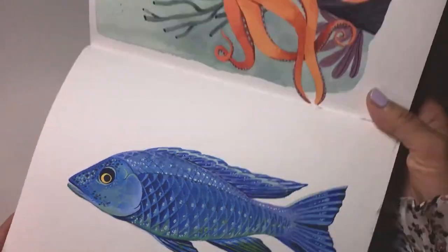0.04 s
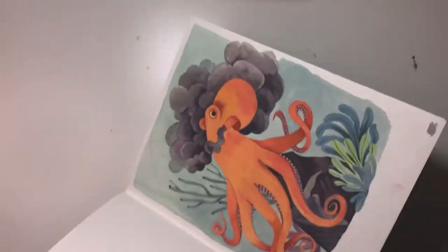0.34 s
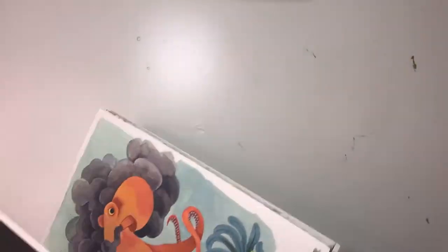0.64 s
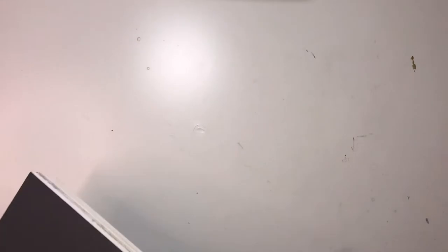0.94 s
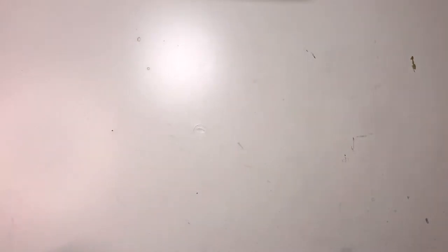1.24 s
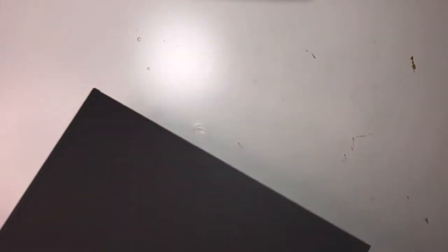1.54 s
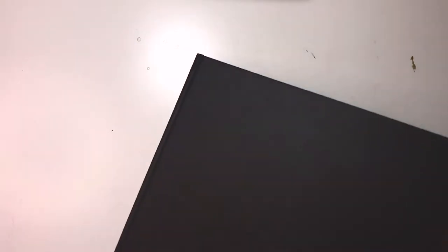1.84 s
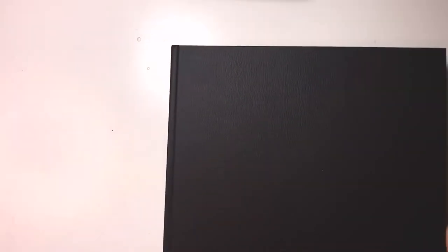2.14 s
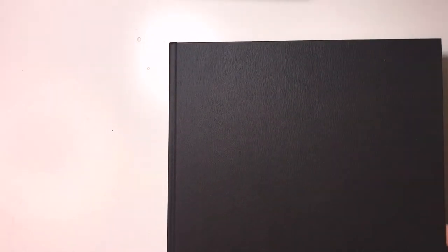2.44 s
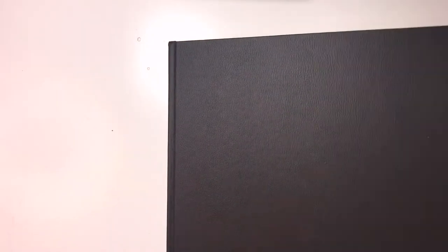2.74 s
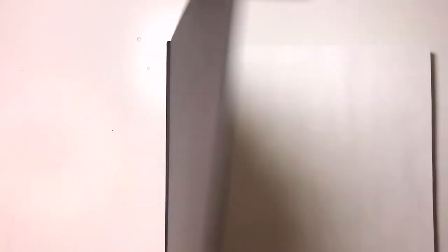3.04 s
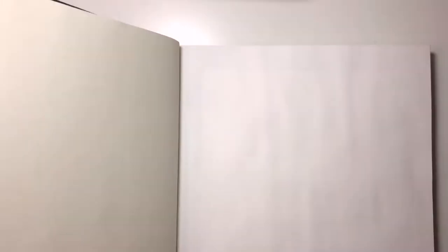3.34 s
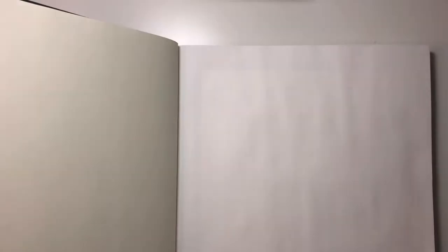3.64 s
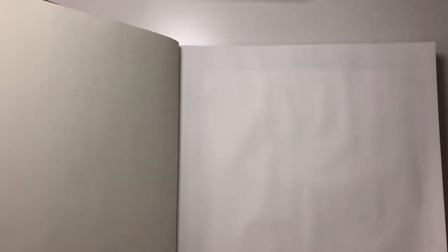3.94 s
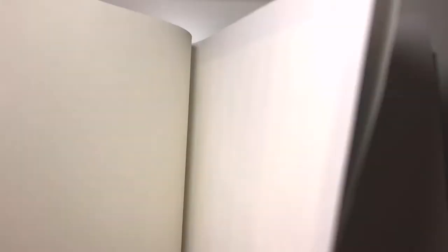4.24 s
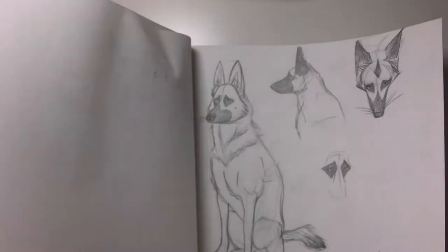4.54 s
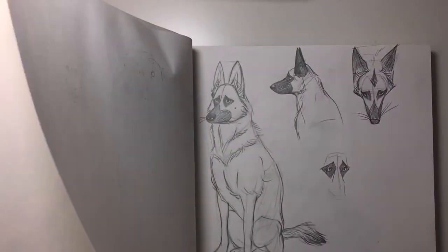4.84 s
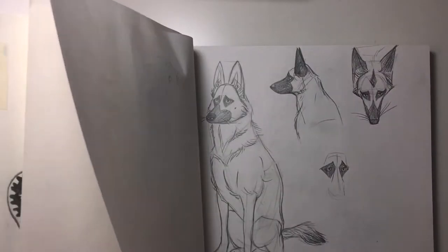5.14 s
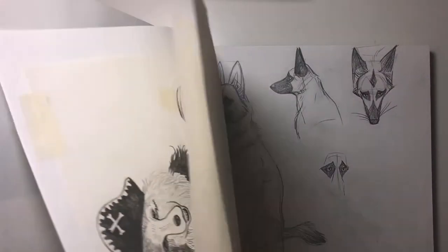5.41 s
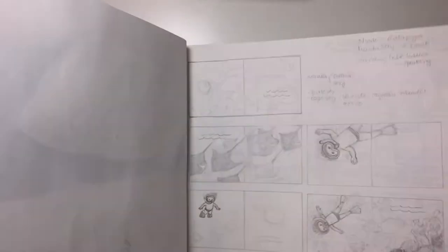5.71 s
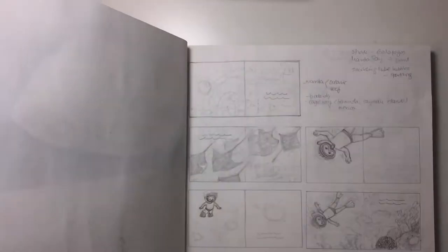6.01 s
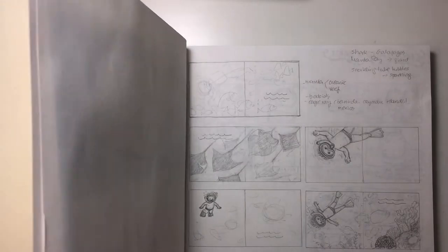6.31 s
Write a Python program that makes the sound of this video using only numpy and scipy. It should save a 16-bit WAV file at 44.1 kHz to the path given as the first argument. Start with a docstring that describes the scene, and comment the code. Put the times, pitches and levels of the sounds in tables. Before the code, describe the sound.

A hardback book is handled and thumps onto a desk, then its paper pages rustle and flick as they turn.

```python
"""Leafing through a sketchbook

A hardback sketchbook is closed, laid on a desk in a small room, opened again and leafed through.
Sheets slide over each other and under the fingers in stick-slip friction, snap as they buckle and
flick as their edges slip free. Cover and spine strike the desk top and excite its modes as thumps;
handling adds a low rumble, and the room a short reverberation and faint steady noise."""
import sys
import numpy as np
from scipy import signal
from scipy.fft import rfft, irfft
from scipy.io import wavfile

SR = 44100
rng = np.random.default_rng(int(sys.argv[2]) if len(sys.argv) > 2 else 0)


def store_pcm(level_fs):
    """Save levels as 16-bit WAV."""
    pcm = np.round(np.clip(level_fs, -1, 1) * 32767).astype(np.int16)
    wavfile.write(sys.argv[1], SR, np.atleast_2d(pcm).T)


N = 289808
TIME = np.arange(N) / SR

# modes of the damped desk top and standing waves of the room: (frequency [Hz], level [dB], T60 [s])
DESK_MODES = [(57.7, -13.5, 0.37), (107.8, -8, 0.34), (150.3, -2, 0.17), (195.7, -15, 0.3),
              (239.5, 9, 0.03), (250.8, -12.5, 0.086), (283.6, -5, 0.15), (339.4, -7, 0.31),
              (424, -13, 0.19), (497, -13.5, 0.17), (570, -20, 0.2), (591, -7.5, 0.15), (676, -20, .07),
              (910, -32, .1), (1280, -31, .08), (1400, -28, 0.12)]


def paper():
    """Source and filter: friction noise in three bands (flexing, rubbing, hiss) drives the sheet."""
    # Butterworth stages of each band: (cutoff [Hz], kind, order)
    flexing = [(1517, "low", 4), (640, "high", 1), (163, "high", 2)]
    rubbing = [(1540, "high", 3), (6680, "low", 4)]
    hiss = [(5540, "high", 3), (12100, "low", 1)]
    friction = np.zeros(N)
    for envelope, band in zip(paper_envelopes(), [flexing, rubbing, hiss]):
        slips = fibre_slips(per_s=3000, spread_db=3.5)
        steady_rms = np.std(sheet(cascade(slips, band)))
        friction += cascade(slips * envelope, band) / steady_rms
    return early_reflections(sheet(friction) + brief_rings(), sway=0.0843, sway_hz=2.0)


def paper_envelopes():
    """Incoherent sources add in power: strokes, buckles and flicks give each band its amplitude."""
    # a hand slides paper or board along:
    # (start [s], duration [s], rubbing [dB], flexing [dB re rubbing], hiss [dB re rubbing])
    strokes = [(-.03, .12, -46.5, -2.5, -1.5), (0.205, 0.075, -52.5, 2, 0), (0.302, 0.17, -43, -11, -0.5),
               (0.587, 0.057, -39.5, -7.5, -1.5), (0.661, 0.078, -46.5, 0, 3.5), (0.76, 0.1, -46, 1.5, 1),
               (0.926, 0.23, -51, -8.5, 6.5), (1.345, 0.047, -56.5, 7, 4), (1.48, 0.077, -56.5, -4, 1),
               (1.659, 0.019, -41.5, 6.5, 6.5), (1.758, 0.089, -53.5, 2.5, 8), (1.843, 0.053, -40, 7.5, -1),
               (1.92, 0.32, -46.5, 1.5, -1), (2.325, 0.039, -50.5, 6, 2), (2.4, 0.17, -72, 13.5, -20),
               (2.57, 0.066, -41, 5, 2), (2.745, 0.12, -47.5, 10, 0), (2.936, 0.1, -46.5, -1.5, -3.5),
               (3.057, 0.089, -42, -2.5, 0.5), (3.218, .035, -41.5, 0, -1.5), (3.336, 0.14, -56, 3, -7),
               (3.6, 0.21, -57, -4, 4.5), (3.764, 0.029, -36.5, -4, 3), (3.817, 0.31, -42, -3.5, -1),
               (3.96, 0.23, -38.5, 2, -6), (4.097, 0.29, -29.5, -3, -3.5), (4.356, 0.18, -30, -5.5, -7),
               (4.578, .14, -40.5, -4.5, -6), (4.787, 0.099, -38.5, -5.5, -4), (4.939, 0.23, -48, -3, -8),
               (5.047, 0.14, -42.5, -5, -5), (5.22, 0.087, -38.5, -18.5, -2),
               (5.28, 0.061, -33.5, -5, -4.5), (5.383, 0.094, -33, -2.5, -3.5),
               (5.544, 0.095, -32.5, -3, -5), (5.679, 0.073, -39, -0.5, -7.5),
               (5.801, 0.023, -32.5, -2, -8), (5.892, 0.12, -35, -6, -6), (5.995, 0.032, -26, -12, 0),
               (6.064, 0.054, -39, -4.5, -1.5), (6.166, 0.098, -53, -3, -3.5),
               (6.273, 0.021, -28, -6, -1.5), (6.375, 0.052, -33, -7, -2.5),
               (6.454, 0.073, -30.5, -9.5, -1.5)]
    # sharp snaps and taps of paper and board:
    # (time [s], rubbing [dB], flexing [dB re rubbing], hiss [dB re rubbing])
    snaps = [(0.222, -39.5, 3, -3.5), (.428, -46, -9, 6), (0.464, -45, -2, -12), (0.552, -46, -16, 4),
             (.603, -30.5, -0.5, -12), (.61, -48, -4, 8), (0.801, -36.5, 17, -7), (.865, -47, 5, 5),
             (1.176, -42.5, -2, 3), (1.265, -59.5, 1, -1), (1.355, -52, -2, 2.5), (1.376, -48.5, 12.5, -4),
             (1.664, -39, 12.5, 5.5), (1.772, -47, 6.5, 12), (1.853, -22, 8, -2.5), (1.882, -35, -1, 3.5),
             (2.128, -53, -3, 10), (2.325, -38.5, 6, -2), (2.368, -52, 1, 7), (2.613, -35.5, -8, 5.5),
             (2.631, -27, -13, 5.5), (2.747, -41.5, 3.5, 4.5), (3.237, -39, -0.5, 1), (3.603, -44, 1, 9),
             (3.711, -45, -0.5, 2), (3.783, -44, -6, 11), (3.813, -35.5, 2, 2), (4.094, -21.5, 1, -1),
             (4.202, -25.5, 0, 0), (4.221, -20.5, -3.5, 2), (4.273, -24, -6, -18), (4.304, -21, -12, -4),
             (4.337, -21.5, -6.5, -5.5), (4.517, -20.5, -4, -7), (4.645, -39.5, 10, -1),
             (5.545, -32, 2.5, -4), (6.005, -33, -10, 2), (6.28, -32.5, -21, 0), (6.526, -22, -9.5, -4)]
    # an edge slips free in a short Gaussian swell:
    # (time [s], rubbing [dB], flexing [dB re rubbing], hiss [dB re rubbing], half length [s])
    flicks = [(0.36, -32.5, -5, -6.5, 0.0053), (4.017, -35.5, 9.5, -1, .003), (4.489, -32, 9, 3.5, 0.008),
              (4.534, -21, -0.5, -8, 0.0032), (4.714, -31, -1.5, -12, 0.0024), (5.05, -29, -2, -13, 0.0025),
              (6.042, -29, 2.5, -3, 0.0014), (6.075, -13, -14, -1, .003), (6.464, -25, -3.5, -4, 0.004)]
    judder_db, judder_hz = 0.78, 56.3  # sliding paper catches and jerks
    crinkles_per_s, crinkle_db = 12, -5.5  # chance buckles, level relative to the sliding
    sliding = sum(band_power(*levels) * stroke(start, length) ** 2 for start, length, *levels in strokes)
    power = sliding * from_db(judder_db * drift(judder_hz)) ** 2
    crinkles = rng.random(N) < crinkles_per_s / SR
    kicks = sliding * crinkles * from_db(crinkle_db) ** 2
    for time, *levels in snaps:
        kicks[:, [int(time * SR)]] += band_power(*levels)
    for time, *levels, half_length in flicks:
        near = abs(TIME - time) < 5 * half_length
        swell = np.exp(-.5 * ((TIME[near] - time) / half_length) ** 2)
        power[:, near] += band_power(*levels) * swell
    return np.sqrt(power + buckle(kicks))


def band_power(rub_db, flex_db, hiss_db):
    """Power is amplitude squared: one event's flexing, rubbing and hiss, as a column."""
    return from_db([[rub_db + flex_db], [rub_db], [rub_db + hiss_db]]) ** 2


def stroke(start, length):
    """Friction follows the hand's speed: a linear attack, a slow sag, then an exponential release."""
    attack_s, sag_db_per_s = 0.034, 17
    release_t60 = 0.11 + 2.38 * length
    age = np.maximum(TIME - start, 0)
    fall_db = sag_db_per_s * np.minimum(age, length) + 60 * np.maximum(age - length, 0) / release_t60
    return np.minimum(age / attack_s, 1) * from_db(-np.minimum(fall_db, 200))


def buckle(kicks):
    """Buckling frees stored elastic energy: the power of a short crack, then of a longer shiver."""
    def decay(t60):
        return signal.lfilter([1], [1, -from_db(-60 / (t60 * SR)) ** 2], kicks + 1e-18)
    crack_db, rise_s = 2, 0.0006
    crack = from_db(crack_db) ** 2 * decay(t60=0.01)
    shiver = decay(t60=0.04)
    lag = np.exp(-1 / (rise_s * SR))
    return signal.lfilter([1 - lag], [1, -lag], crack + shiver)


def fibre_slips(per_s, spread_db):
    """Shot noise: fibres catch and let go in uneven clicks, over a smooth hiss of equal power."""
    slipping = rng.random(N) < per_s / SR
    sizes = from_db(spread_db * np.minimum(rng.exponential(1, N), 5))
    clicks = slipping * sizes * rng.choice([-1, 1], N)
    return rms_one(rms_one(clicks) + rng.standard_normal(N))


def sheet(x):
    """Resonance: a held sheet reinforces the excitation near its natural frequencies."""
    # resonances of the sheet: (frequency [Hz], bandwidth [Hz], level [dB re excitation])
    sheet_modes = [(676, 62, 2.5), (1130, 36, -46), (1240, 48, -11), (1687, 123, 1), (2550, 1600, 2),
                   (3690, 690, -4.5), (6070, 590, -14), (13800, 2800, -35)]
    return x + sum(from_db(db) * resonance(x, hz, width_hz) for hz, width_hz, db in sheet_modes)


def brief_rings():
    """Resonance: paper or board rasps when rubbed and gives a pitched snap when it buckles or is tapped."""
    # paper or board rings briefly around one pitch:
    # (time [s], half length [s], frequency [Hz], nominal bandwidth [Hz], level [dB])
    rings = [(0.356, 0.051, 607, 160, -45), (.615, .01, 14000, 6000, -37), (0.727, .025, 14000, 6000, -44),
             (0.804, 0.0019, 1440, 852, -23.5), (0.832, 0.023, 602, 70, -42.5),
             (1.028, 0.058, 13650, 6000, -42), (1.142, 0.019, 13400, 6000, -40),
             (2.789, 0.026, 616, 220, -35), (2.804, 0.037, 1070, 300, -51), (3.011, .025, 3650, 747, -41),
             (3.121, 0.026, 4130, 1600, -41), (3.24, 0.0026, 14300, 5970, -36),
             (3.874, 0.05, 1570, 350, -41.5), (3.961, .039, 5700, 1100, -41.5),
             (4.083, 0.023, 960, 150, -34.5), (4.1216, 0.00071, 2670, 900, -18.5),
             (4.185, 0.034, 3780, 600, -33.5), (4.493, 0.017, 1085, 128, -26),
             (4.495, .015, 1570, 500, -27), (4.518, .002, 1940, 900, -19.5),
             (4.839, .022, 2720, 1260, -36.5), (5.297, 0.018, 5630, 650, -35),
             (5.351, 0.032, 4030, 600, -40.5), (5.433, 0.017, 576, 300, -35),
             (5.471, .0087, 2520, 603, -32), (5.739, 0.03, 1670, 450, -43.5),
             (6.073, .003, 1400, 735, -14.5)]
    out = np.zeros(N)
    for time, half_length, hz, width_hz, db in rings:
        near = abs(TIME - time) < 5 * half_length
        excitation = rng.standard_normal(SR)
        stage_width_hz = 1.36 * width_hz  # two stages in series narrow the band
        ring = rms_one(resonance(resonance(excitation, hz, stage_width_hz), hz, stage_width_hz))
        swell = np.exp(-((TIME[near] - time) / (2 * half_length)) ** 2)
        out[near] += from_db(db) * ring[-near.sum():] * swell
    return out


def thumps():
    """Impact excitation: the longer the contact, the narrower the spectrum and the duller the thud."""
    # the book knocks on the desk, or a page lands: (time [s], strength [dB], contact time [s])
    impacts = [(.603, -22, 0.0012), (0.8, -23.5, 0.0019), (1.361, -28, 0.00059), (1.377, -23, 0.0001),
               (1.395, -25, 0.00014), (1.665, 4.5, 0.00079), (1.854, 9.5, 0.00062), (1.862, -3.5, 0.0073),
               (1.879, 0, 0.00056), (1.962, -13, 0.000083), (2.129, -29, 0.0025), (2.201, -29, .0035),
               (2.298, -16, 0.0021), (2.326, -25, .00017), (2.367, -24.5, 0.00026), (2.612, -15, .0015),
               (2.623, -7.5, .006), (2.63, -14, 0.00069), (3.063, -24.5, 0.00094), (3.099, -26, 0.0071),
               (3.241, -18.5, 0.0012), (3.439, -26.5, 0.019), (3.602, -25, 0.0094), (4.099, -20, .00014),
               (4.22, -20, 0.00036), (4.309, -17.5, 0.000078), (5.428, -21.5, 0.00049),
               (5.801, -20.5, 0.00063), (5.96, -26.5, .00045)]
    force = np.zeros(N)
    for time, db, contact_s in impacts:
        start = int(time * SR)
        contact_age = TIME[:SR // 8] / contact_s
        pulse = contact_age * np.exp(-contact_age)
        # soft pulses reach only the lowest modes, so each is divided by how strongly it is taken up
        uptake = sum(from_db(mode_db) / (1 + (2 * np.pi * hz * contact_s) ** 2)
                     for hz, mode_db, _ in DESK_MODES)
        force[start:start + len(pulse)] += from_db(db) * pulse / (pulse.sum() * uptake)
    return butter(desk(force), 40, "high", order=4)


def desk(force):
    """Modal superposition: the modes' velocities add, and their even spacing makes a thud flutter."""
    out = np.zeros(N)
    for hz, db, t60 in DESK_MODES:
        radius, angle = from_db(-60 / (t60 * SR)), 2 * np.pi * hz / SR
        poles = [1, -2 * radius * np.cos(angle), radius ** 2]
        out += from_db(db) * signal.lfilter([.5, 0, -.5], poles, force + 1e-18)
    return out


def handling():
    """Forced vibration: hands and binding rub the desk into a rumble that swells with each shove."""
    # the book is pushed over the desk: (start [s], duration [s], level [dB])
    shoves = [(0.81, .11, -44), (1.718, 0.097, -30.5), (1.987, 0.79, -39.5), (2.642, 0.15, -37),
              (3.957, 0.13, -47), (4.436, 0.22, -40), (5.795, 0.053, -46)]
    holding_db = -55  # the hands merely hold the book
    shove_power = sum((from_db(db) * stroke(start, length)) ** 2 for start, length, db in shoves)
    envelope = np.sqrt(from_db(holding_db) ** 2 + shove_power)
    friction = butter(rng.standard_normal(N), 73, "low")
    rumble = butter(desk(friction), 41.3, "high", order=3)
    return envelope * rms_one(rumble)


def early_reflections(x, sway, sway_hz):
    """Comb filtering: delayed copies interfere with the direct sound and shift as the pages move."""
    # paths by way of desk, pages and wall: (delay [s], gain [ratio])
    paths = [(.0009, 0.24), (.0021, 0.31), (.0047, -0.19), (.0083, 0.097)]
    reflected = np.zeros(N)
    for delay, gain in paths:
        moving_delay = delay * np.exp(sway * drift(sway_hz))
        reflected += gain * np.interp(TIME - moving_delay, TIME, x, left=0)
    return x + reflected


def reverberation(x):
    """A diffuse field decays exponentially; absorption at the walls dulls it."""
    level_db, t60, onset_s, wall_cutoff_hz = -19, 0.26, 0.006, 1150
    age = TIME[:SR // 2]
    tail = rng.standard_normal(len(age)) * from_db(-60 * age / t60) * (age > onset_s)
    tail = butter(tail, wall_cutoff_hz, "low", order=1)
    return from_db(level_db) * signal.fftconvolve(x, tail / np.linalg.norm(tail))[:N]


def room_noise(level_db):
    """Stationary noise, shaped in frequency into a faint hum and hiss."""
    # spectrum of the quiet room: (frequency [Hz], relative spectral density [dB])
    noise_spectrum = [(25, -23), (55, 6), (110, -1.5), (170, 3), (500, -5.5), (1200, -11.5), (2100, -12.5),
                      (8000, -18.5), (10500, -23), (16000, -15)]
    hz, db = np.transpose(noise_spectrum)
    bin_hz = np.fft.rfftfreq(N, 1 / SR)
    colour = from_db(np.interp(np.log(bin_hz + 1), np.log(hz), db))
    noise = irfft(rfft(rng.standard_normal(N)) * colour, N)
    return from_db(level_db) * rms_one(noise)


def from_db(db):
    """Amplitude ratio of a level in decibels."""
    return 10 ** (np.asarray(db) / 20)


def rms_one(x):
    """Normalisation to unit mean power."""
    return x / np.sqrt(np.mean(x ** 2) + 1e-20)


def butter(x, hz, kind, order=2):
    """Causal Butterworth filter, maximally flat in its passband."""
    return signal.sosfilt(signal.butter(order, hz, kind, fs=SR, output="sos"), x + 1e-18)


def cascade(x, stages):
    """Filters in series multiply their responses."""
    for hz, kind, order in stages:
        x = butter(x, hz, kind, order)
    return x


def resonance(x, hz, width_hz):
    """Damped oscillator: a two-pole band-pass with unit gain at its peak."""
    radius = np.exp(-np.pi * width_hz / SR)
    poles = [1, -2 * radius * np.cos(2 * np.pi * hz / SR), radius ** 2]
    return signal.lfilter(np.array([1, 0, -1]) * (1 - radius ** 2) / 2, poles, x)


def drift(hz):
    """Random modulation: low-passed noise of unit rms."""
    return rms_one(butter(rng.standard_normal(N + SR), hz, "low")[SR:])


def scene():
    """Superposition: direct sound of paper and desk, its reverberation, rumble and room noise."""
    direct = paper() + thumps()
    return (direct + reverberation(direct) + handling() + room_noise(level_db=-52))[None]


def record(dry):
    """Clipping and band limiting: the loudest knock overloads, and a steep low-pass cuts the top."""
    cutoff_hz = 16000
    low_pass = signal.ellip(10, .1, 80, cutoff_hz, fs=SR, output="sos")
    return signal.sosfilt(low_pass, np.clip(dry, -1, 1))


dry = scene()
out = record(dry)
store_pcm(out)
```